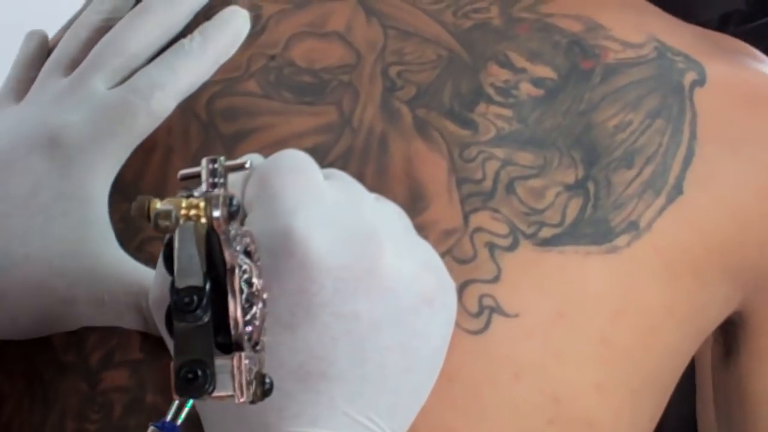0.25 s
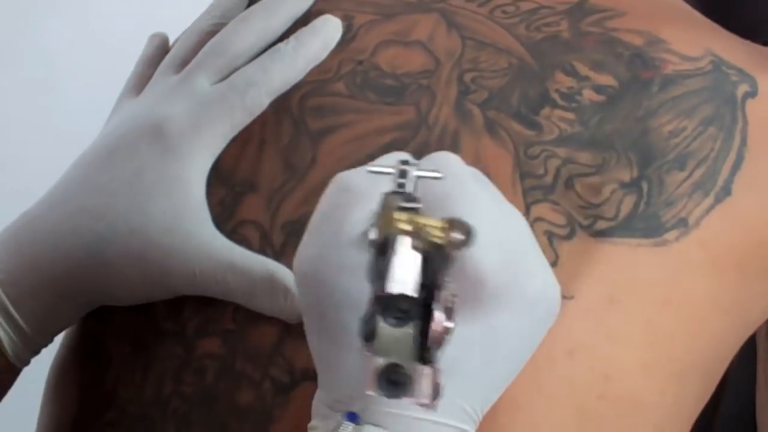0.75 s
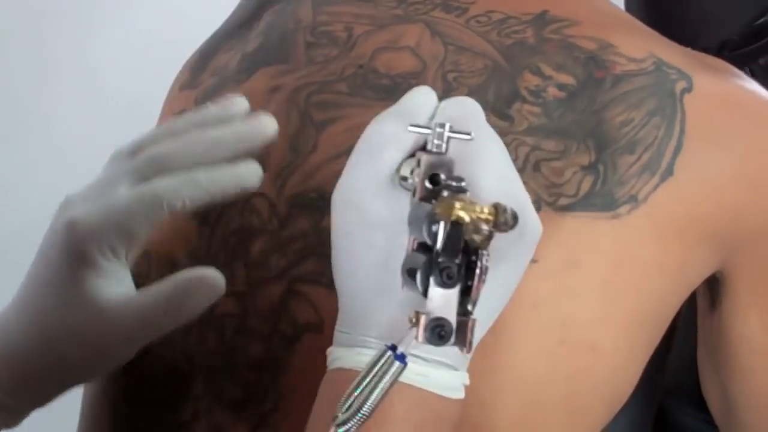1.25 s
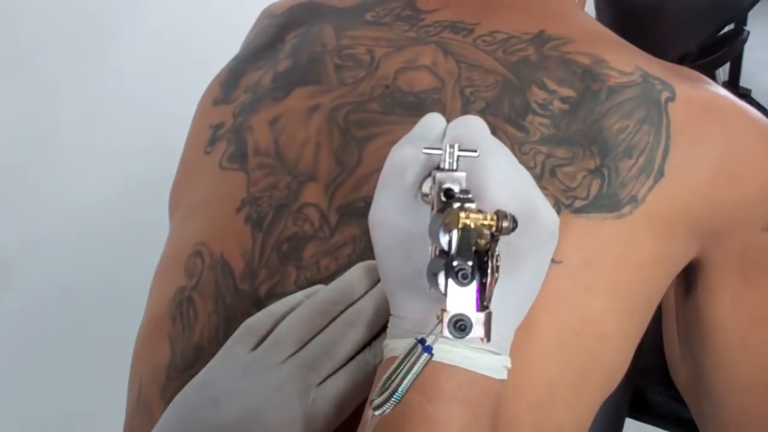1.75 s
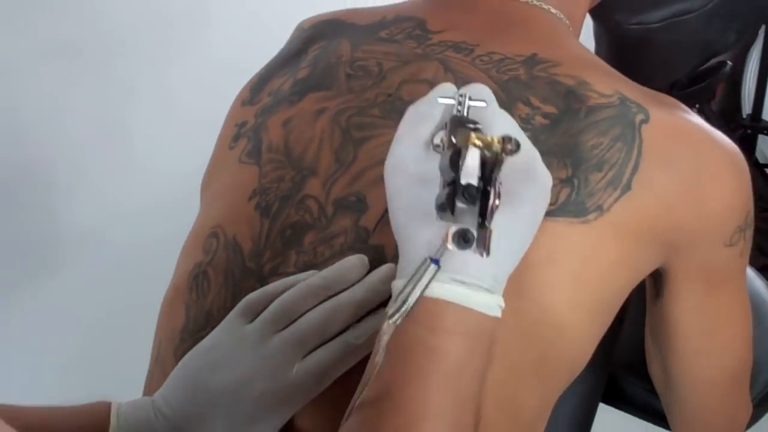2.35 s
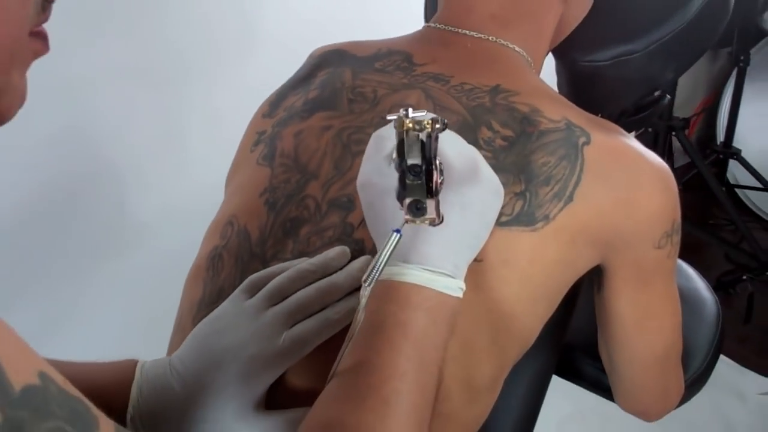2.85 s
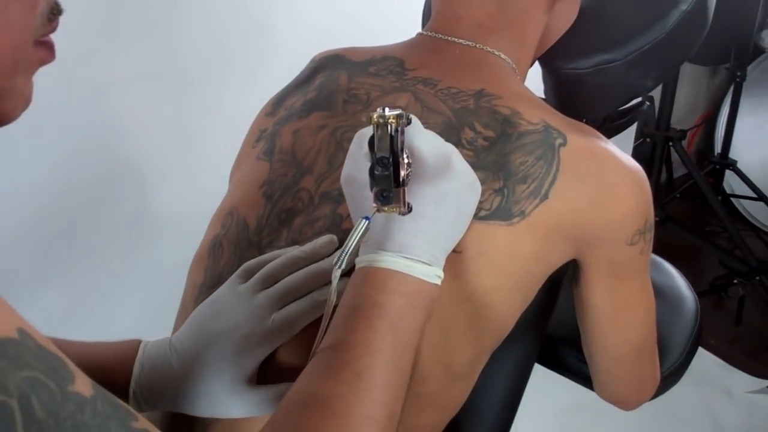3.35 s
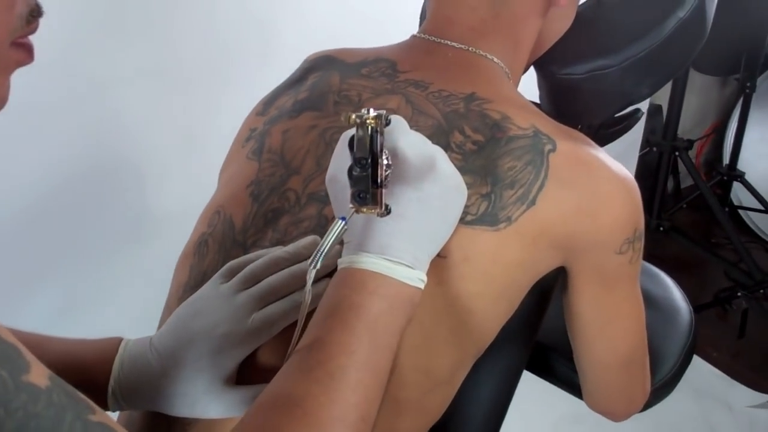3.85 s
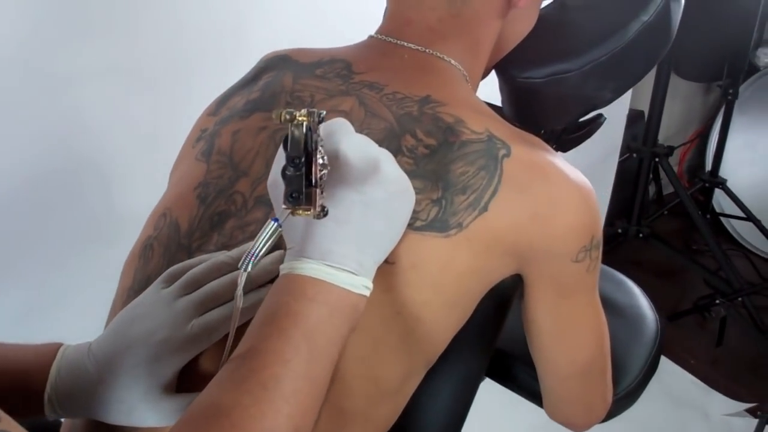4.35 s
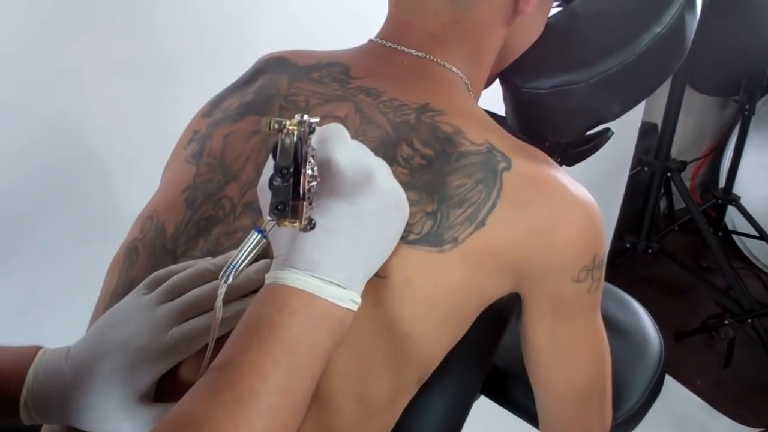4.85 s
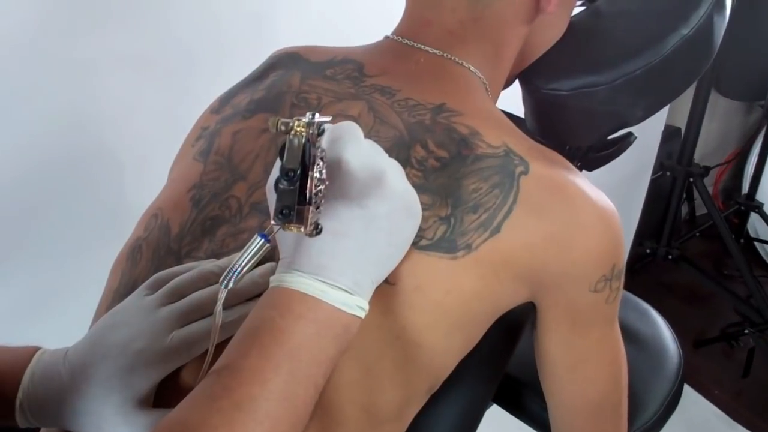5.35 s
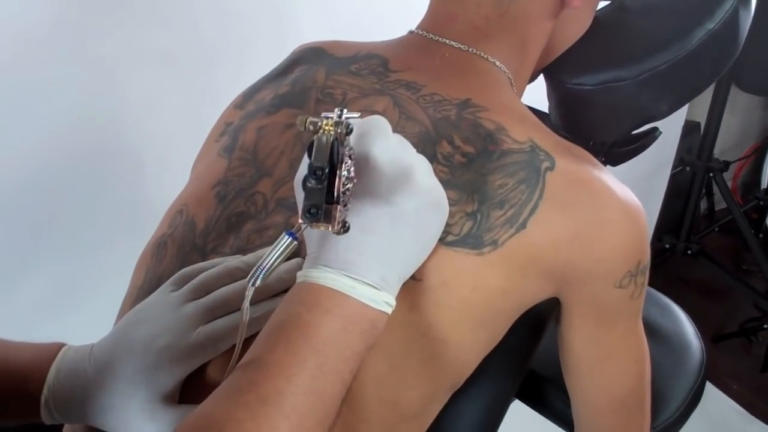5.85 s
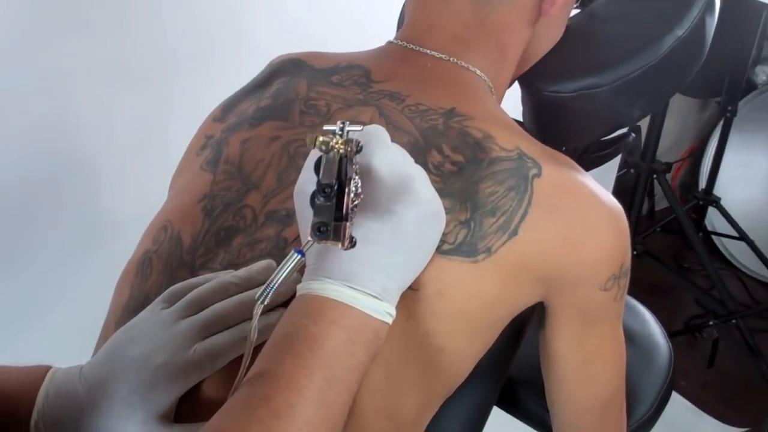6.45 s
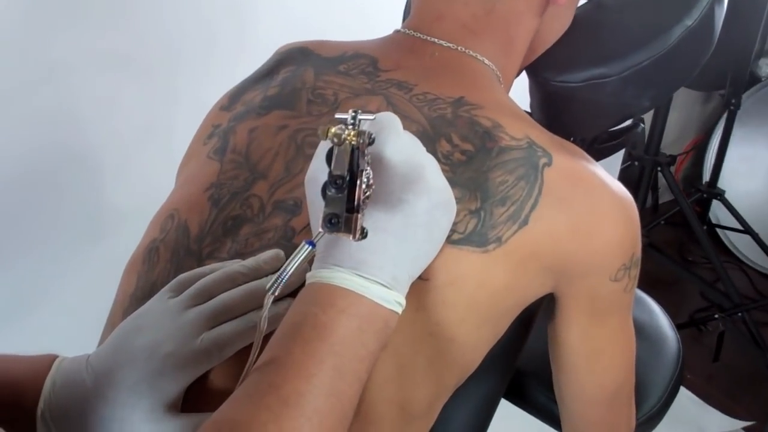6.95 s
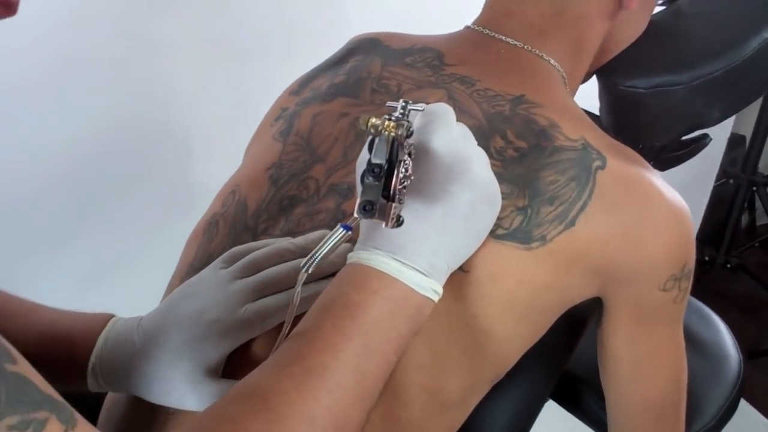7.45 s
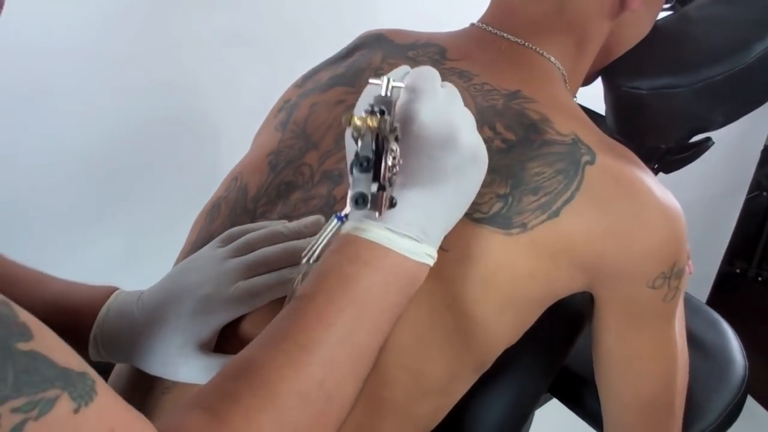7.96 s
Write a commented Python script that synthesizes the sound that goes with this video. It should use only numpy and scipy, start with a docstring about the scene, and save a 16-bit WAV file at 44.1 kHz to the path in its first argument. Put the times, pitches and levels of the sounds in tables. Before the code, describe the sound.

A coil tattoo machine runs close to the microphone in a small, hard-walled room. Its very fast metallic clacks merge into a shrill, unbroken buzz, with a steady high hiss underneath. The ringing tone shifts as the machine is turned, and a low hum swells, fades and returns near the end. The buzz grows a little more ragged in the second half as the needle works the skin.

```python
"""A shrill, clacking buzz: a coil tattoo machine runs close by in a small hard-walled studio.
Its armature slams on the coils 73 times a second, now and then a stroke early, and each impact
excites the modes of the steel frame. As the hand turns the machine the ringing changes and a low
thump under each stroke swells and fades. Reverberation smears the clacks into a steady high hiss."""
import sys
import numpy as np
from scipy import signal
from scipy.io import wavfile
from scipy.ndimage import uniform_filter1d

SR = 44100
rng = np.random.default_rng(int(sys.argv[2]) if len(sys.argv) > 2 else 0)


def digitize_waveform(pressure):
    """Quantize a signal to 16-bit integers and store it at the path in sys.argv[1].

    Rows of a 2-D input are taken as channels; values are limited to [-1, 1].
    """
    field = np.atleast_2d(pressure).T
    bounded = np.clip(field, -1, 1)
    quanta = np.round(bounded * 32767).astype(np.int16)
    wavfile.write(sys.argv[1], SR, quanta)


N = 362502
TIME = np.arange(N) / SR


def amp(db):
    """Amplitude ratio of a level in decibels."""
    return 10 ** (np.asarray(db) / 20)


def evened(x):
    """Normalisation to an overall rms of 1."""
    return x / np.sqrt(np.mean(x ** 2) + 1e-20)


def steadied(x, size=4816):
    """Normalisation to a running rms of 1, the power being smoothed twice over size samples."""
    power = uniform_filter1d(uniform_filter1d((x ** 2).mean(0), size), size)
    return x / np.sqrt(abs(power) + 1e-20)


def curves(rows):
    """Linear interpolation of a table's columns at every sample."""
    times, *columns = np.transpose(rows)
    return [np.interp(TIME, times, column) for column in columns]


def wander(t, rate):
    """Superposition of sines of random phase, from rate / 10 to rate: a slow drift of rms 1."""
    hz = np.geomspace(rate / 10, rate, 20)[:, None]
    sines = np.sin(2 * np.pi * (hz * t + rng.random(hz.shape)))
    return evened((sines / np.sqrt(hz)).sum(0))


def colour(x, points, size=8192):
    """Minimum-phase filtering to a spectrum given as (f/Hz, gain/dB) points."""
    hz, db = np.transpose(points)
    log_hz = np.log(abs(np.fft.fftfreq(size, 1 / SR)) + 1)
    log_gain = np.log(amp(np.interp(log_hz, np.log(hz), db)))
    taps = np.fft.ifft(np.exp(np.conj(signal.hilbert(log_gain)))).real[:size // 2]
    return signal.oaconvolve(x, taps[None], axes=1)[:, :N]


def ring(x, hz, width):
    """Resonance of one damped mode, with its bandwidth in hertz."""
    r = np.exp(-np.pi * width / SR)
    return signal.lfilter([1, 0, -1], [1, -2 * r * np.cos(2 * np.pi * hz / SR), r * r], x)


def clicks(times, sizes, order=8):
    """Band-limited impulses: a windowed sinc places each one between the samples."""
    at = np.floor(times * SR).astype(int)[:, None] + np.arange(1 - order, order + 1)
    offset = at - times[:, None] * SR
    shape = sizes[:, None] * np.sinc(offset) * np.cos(np.pi * offset / (2 * order)) ** 2
    inside = (at >= 0) & (at < N)
    return np.bincount(at[inside], shape[inside], N)


def stroke_times(period_s=.01369, short_s=.0111, unsteady_s=0.000585, count=800):
    """Self-interrupted oscillation: under load the contact closes unsteadily and strokes come short."""
    # chance of an early fall, which grows as the needle works the skin: t/s, probability
    stumble = [(0, .07), (2.2, .09), (2.7, .17), (3.4, .09), (4.6, .2), (5.3, .3), (7.35, .33), (7.5, .03),
               (8.22, .12)]
    times, chance = np.transpose(stumble)
    t = [.004]
    for draw in rng.random(count):
        early = draw < np.interp(t[-1], times, chance)
        t.append(t[-1] + (short_s if early else period_s))
    t = np.array(t) + unsteady_s * np.interp(t, times, chance) * rng.standard_normal(len(t))
    return t[t < N / SR]


def armature(t, force, bounce_db=.7, jitter_s=.00015, path_s=.000005, rattle_db=-12, rattle_s=0.00047):
    """Impact excitation, as each microphone port gets it: blow, rebounds and the needle bar's rattle."""
    # blow, rebound, chatter, spring closing on the contact screw: delay/s, relative level/dB, drift/s
    impacts = [(0, -4, 0.00068), (.0007, -2.5, 0), (.0013, -6, 0.0012), (.0073, -28, 0.0065)]
    hits = np.zeros((2, N))
    for k, (delay, db, drift) in enumerate(impacts):
        loose = min(k, 1)  # only the first blow has no random scatter
        at = t + delay + drift * wander(t, 3) + loose * jitter_s * rng.standard_normal(len(t))
        size = force * amp(db + loose * bounce_db * rng.standard_normal(len(t)))
        hits += [clicks(at + (k + 1) * path_s * wander(t, 2), size) for port in hits]
    envelope = signal.lfilter([1], [1, -np.exp(-1 / (rattle_s * SR))], clicks(t, force))
    rattle = evened(envelope * rng.standard_normal((2, N)))
    return evened(hits) + amp(rattle_db) * rattle


def disperse(x, spread_s=.00045, size=1024):
    """Dispersion: bending waves cross the frame at speeds that depend on their frequency."""
    hz = np.fft.rfftfreq(size, 1 / SR)
    group_delay = spread_s * np.clip(hz / 4000, 0, 1) * (1 + np.tanh(wander(hz / 1000, 0.87)))
    phase = -2 * np.pi * np.cumsum(group_delay) * SR / size
    taps = np.fft.irfft(np.exp(1j * phase))[:size // 4]
    return signal.oaconvolve(x, taps[None], axes=1)[:, :N]


def rippled(x, ripple_db=3.0, size=256):
    """Shifting colour: narrow bands of the clack swell and fade at random."""
    bands = signal.stft(x, nperseg=size)[2]
    ripple = rng.standard_normal(bands.shape[1:])
    for count in (2, 3):
        ripple = uniform_filter1d(ripple, count, axis=0)  # across frequency
        ripple = uniform_filter1d(ripple, size // count, axis=1)  # across time
    return signal.istft(bands * amp(ripple_db * evened(ripple)), nperseg=size)[1][:, :N]


def clack(hits, level_db=-25.0):
    """Impact radiation: brief contacts give a broad, bright spectrum."""
    # spectrum of the clack: f/Hz, relative level/dB
    spectrum = [(50, -47), (200, -23), (600, -12.5), (1000, -10), (1600, -16), (2300, -16.5), (3100, -10.5),
                (4200, -10.5), (5200, -11), (7000, -9.5), (9000, -6), (11000, -7.5), (14000, 2.5),
                (16000, -30)]
    return amp(level_db) * steadied(rippled(colour(hits, spectrum)), size=602)


def knock(t, force, gain_db=8.0, jitter_s=.00007, lag_s=0.0002403, sway_s=0.00016076):
    """Recoil: the whole machine answers each blow with a dull knock, which reaches the left port late."""
    # spectrum of the knock: f/Hz, relative level/dB
    spectrum = [(40, -62), (90, -28.5), (170, -6.5), (350, -3), (600, -2.5), (800, -3), (1050, -9.5),
                (1200, -11), (1500, -5.5), (2200, -27.5), (3000, -20), (5000, -11)]
    # strength of the knock: t/s, relative level/dB
    knock_level = [(0.0, -46), (0.02, -47), (0.55, -45), (1.33, -36), (1.69, -41.5), (2.04, -37),
                   (2.38, -43.5), (4.03, -44.5), (5.08, -54.5), (5.81, -39), (6.18, -44.5), (6.27, -36),
                   (6.59, -46.5), (7.81, -37), (8.2, -48), (8.22, -52)]
    level_db, = curves(knock_level)
    at = t + jitter_s * rng.standard_normal(len(t))
    lag = lag_s + sway_s * wander(t, 2)
    recoil = np.array([clicks(at + lag, force), clicks(at, force)])
    return amp(level_db + gain_db) * steadied(colour(recoil, spectrum))


def frame(hits, gain_db=-0.5, waver_db=-1.0):
    """Modal ringing: the steel frame's modes share each stroke, in a mix that shifts as the hand turns."""
    # high modes: f/Hz, bandwidth/Hz, relative level/dB, gain edge-on/dB, dB per dB of second-mode share
    modes = [(11450, 360, -14.5, 6.5, -0.94), (12396, 370, -0.5, -5, -0.5), (13180, 350, -8.8, -3, -1.84),
             (14100, 330, -21, 2, 0.5)]
    # how far the hand turns the machine edge-on to the microphone: t/s, turn (0 to 1)
    turning = [(0, 0.4), (1.1, 0), (2.3, .05), (2.9, 1), (5.8, 0.7), (6.2, 1), (7.5, 1), (7.75, 0.4),
               (8.22, 0.5)]
    # shrill ring: t/s, relative level/dB, second-mode share/dB
    shrill_level = [(0.0, -8, 2), (0.02, -16, -18), (0.27, -18.5, -6), (0.6, -18.5, 4), (0.66, -17, -1),
                    (0.75, -17, -3), (1.08, -19.5, -8), (1.1, -19, -7), (2.33, -19.5, -9),
                    (2.72, -17.5, -11), (2.88, -16.5, 2), (4.03, -16.5, 0.5), (5.01, -17, -7),
                    (5.43, -16.5, -6), (6.25, -20, -7.5), (7.62, -18.5, -11.5), (7.71, -16.5, -5),
                    (8.22, -21, -7)]
    # lower modes of grip and frame, heard in some postures: start t/s, end t/s, f/Hz, width/Hz, level/dB
    postures = [(-.3, 0.648, 5670, 250, -44), (-.3, .65, 10040, 303, -36), (-.3, 0.702, 2560, 400, -49.5),
                (0.958, 2.506, 1290, 420, -43.5), (2.812, 4.297, 5400, 280, -42.5),
                (2.6, 5.303, 1340, 900, -46.5), (5.296, 7.388, 4150, 245, -54),
                (7.623, 8.06, 3420, 1020, -39)]
    turn, = curves(turning)
    level_db, second_db = curves(shrill_level)
    coarse_time = TIME[::441]
    shrill = 0
    for hz, width, db, edge_db, follow in modes:
        waver = np.interp(TIME, coarse_time, wander(coarse_time, 5.4))
        share = amp(db + edge_db * turn + follow * second_db + waver_db * waver)
        shrill = shrill + share * steadied(ring(hits, hz, width))
    ringing = amp(level_db + gain_db) * steadied(shrill, size=602)
    for start, end, hz, width, db in postures:
        progress = np.clip((TIME - start) / (end - start), 0, 1)
        facing = np.sqrt(abs(np.sin(np.pi * progress)))
        ringing += amp(db) * facing * evened(ring(hits, hz, width))
    return ringing


def leaf_spring(t, force):
    """Free vibration: the leaf spring rings faintly after each stroke."""
    # modes of the spring: f/Hz, bandwidth/Hz, level/dB
    modes = [(1265, 37, -50), (3220, 400, -43)]
    blows = clicks(t, force)[None]
    return sum(amp(db) * steadied(ring(blows, hz, width), size=1806) for hz, width, db in modes)


def thump(t, force, gain_db=5.5, rebound_s=0.00059, rebound_db=-4, jitter_s=.0001, loose_db=-49):
    """Low thump: a one-sided low pulse under each stroke, swelling and fading as the machine moves."""
    # spectrum of the thump: f/Hz, relative level/dB
    spectrum = [(15, -49), (40, 13), (75, 5), (150, 9), (300, 7), (600, 2), (950, -15), (1300, -17),
                (1900, -5.5), (2600, -7.5), (4000, -46)]
    # strength and place of the thump: t/s, relative level/dB, left minus right/dB
    thump_level = [(0.0, -46, -11), (0.09, -40, -27), (0.23, -44, -5), (0.34, -41.5, -33), (0.73, -45, -16),
                   (0.96, -31, -22), (1.12, -38.5, -19.0), (1.21, -31.5, -6.5), (1.44, -31.5, 5),
                   (1.67, -37, 14), (1.83, -32.5, -9.5), (1.99, -33.5, -5), (2.33, -35.5, -12.5),
                   (2.79, -43.5, 3), (2.86, -47, -16), (3.02, -55.5, 3), (5.33, -49.5, -28),
                   (7.3, -38, -19), (7.6, -37.5, -20), (7.83, -31.5, -2.5), (8.15, -41, -2),
                   (8.22, -42, -6.0)]
    level_db, pan_db = curves(thump_level)
    delays = rebound_s + jitter_s * rng.standard_normal((2, len(t)))
    pulses = np.array([clicks(t, force) + clicks(t + late, amp(rebound_db) * force) for late in delays])
    # a small part differs from stroke to stroke
    loose = np.array([clicks(t + late, rng.standard_normal(len(t))) for late in delays])
    balance = amp(np.array([pan_db, -pan_db]) / 2)
    balance /= np.sqrt((balance ** 2).mean(0))
    regular = amp(level_db + gain_db) * balance * steadied(colour(pulses, spectrum))
    return regular + amp(loose_db) * evened(colour(loose, spectrum))


def room(x, t60_s=0.28, first_s=0.0025, shift_hz=0.967, count=3):
    """Reverberation: dense wall reflections decay exponentially and shift as the hand moves."""
    # what the walls return: f/Hz, gain/dB
    wall_tone = [(100, 3), (800, -11), (1600, 0), (3000, 2), (7000, 3), (10000, 2.5), (12500, -3),
                 (14100, 2)]
    # share of the room in the sound: t/s, gain/dB
    wet = [(0, -2), (1.4, -3), (2.5, -2), (3.5, -6), (4.6, -3), (5.5, -2), (6.7, -2), (7.4, -1.5),
           (7.85, -4.5), (8.22, 0)]
    wet_db, = curves(wet)
    t = np.arange(SR // 2) / SR
    decay = amp(-60 * t / t60_s) * np.clip(t / first_s - 1, 0, 1)
    decay /= np.linalg.norm(decay) * np.sqrt(count / 2)
    reflections = np.zeros((2, N))
    for k in range(count):
        crossfade = np.cos(np.pi * (TIME * shift_hz + k / count))
        response = decay * rng.standard_normal((2, len(t)))
        reflections += crossfade * signal.oaconvolve(x, response, axes=1)[:, :N]
    return amp(wet_db) * colour(reflections, wall_tone)


def noise_floor(level_db=-51):
    """Stationary noise: a faint hiss lies under the machine."""
    # spectrum of the hiss: f/Hz, relative level/dB
    spectrum = [(20, 26), (60, -18), (150, -33), (400, -7.5), (1000, 6), (4000, 28), (14000, 3)]
    return amp(level_db) * evened(colour(rng.standard_normal((2, N)), spectrum))


def scene(uneven_db=2.5, jitter_s=.00005):
    """Superposition: one train of strokes drives every part of the machine, and the room answers."""
    # place of the machine: t/s, left minus right/dB
    place = [(0.0, 0), (0.5, -1.5), (0.71, 0), (3.64, -1), (6.02, 0), (7.49, -0.5), (7.78, 1.5),
             (8.22, -1.5)]
    pan_db, = curves(place)
    balance = amp(np.array([pan_db, -pan_db]) / 2)
    t = stroke_times()
    t = t + jitter_s * rng.standard_normal(len(t))  # the sparking contact never closes quite on time
    force = amp(uneven_db * rng.standard_normal(len(t)))
    hits = disperse(armature(t, force))
    machine = clack(hits) + knock(t, force) + frame(hits)
    buzz = balance * (machine + leaf_spring(t, force) + room(machine))
    return buzz + thump(t, np.sqrt(force)) + noise_floor()


def record(dry, ceiling=.9, edge_hz=14270):
    """Saturation and band limiting: the microphone softly flattens the clacks, then a low-pass acts."""
    flattened = ceiling * np.tanh(dry / ceiling)
    low_pass = signal.firwin(301, edge_hz, window=("kaiser", 7), fs=SR)
    return signal.oaconvolve(flattened, low_pass[None], "same")


dry = scene()
out = record(dry)
digitize_waveform(out)
```